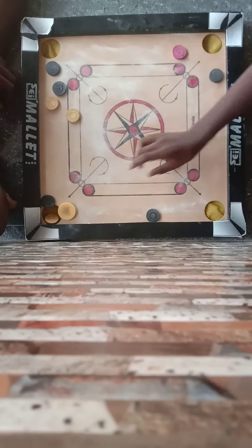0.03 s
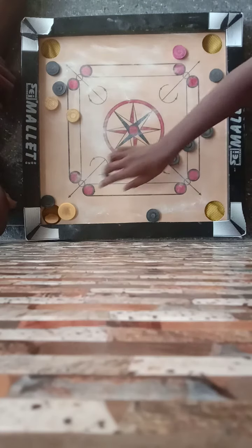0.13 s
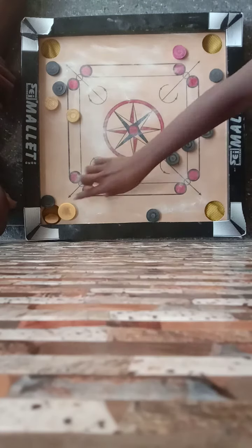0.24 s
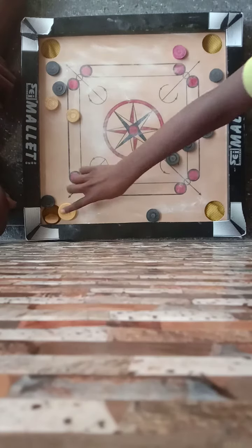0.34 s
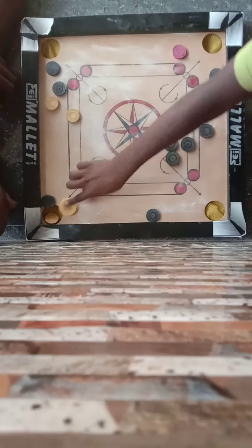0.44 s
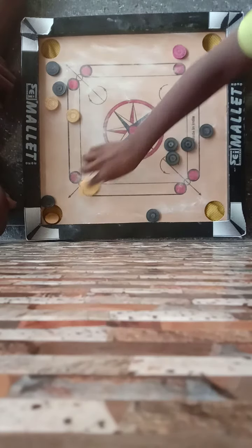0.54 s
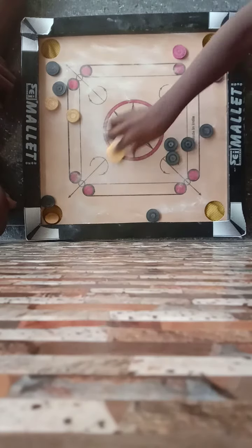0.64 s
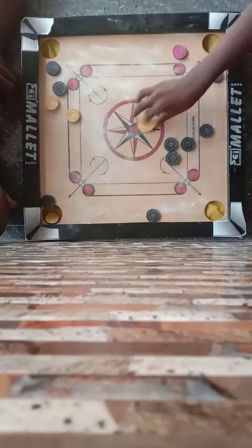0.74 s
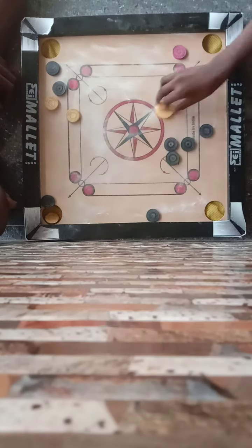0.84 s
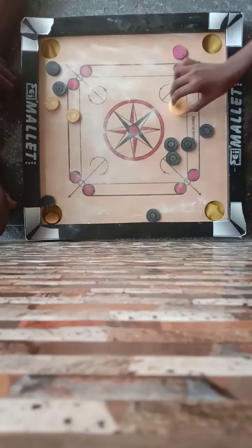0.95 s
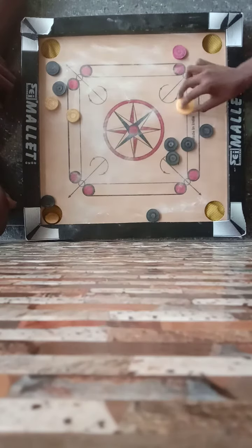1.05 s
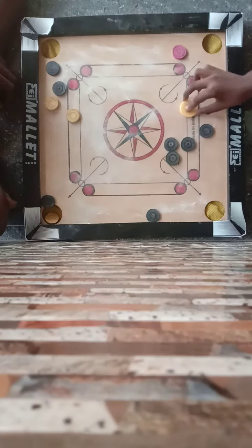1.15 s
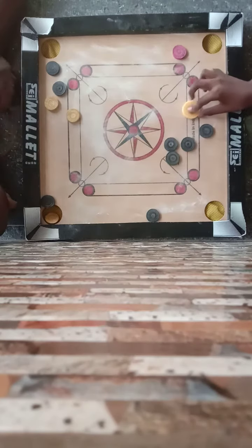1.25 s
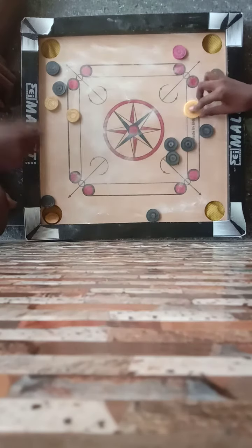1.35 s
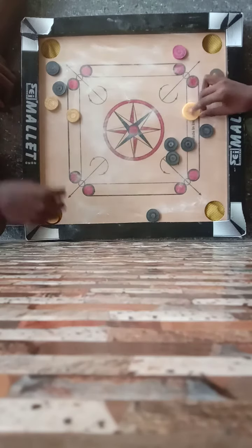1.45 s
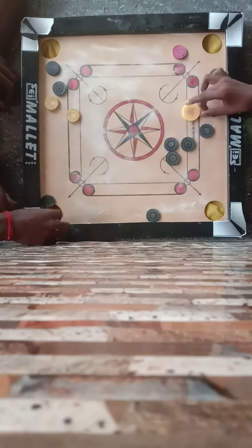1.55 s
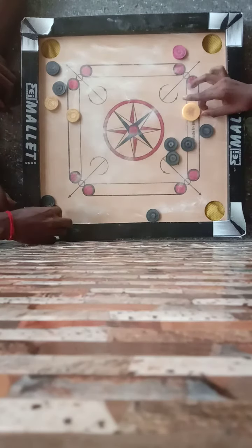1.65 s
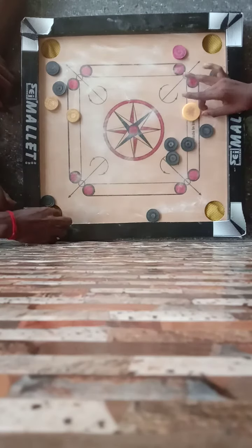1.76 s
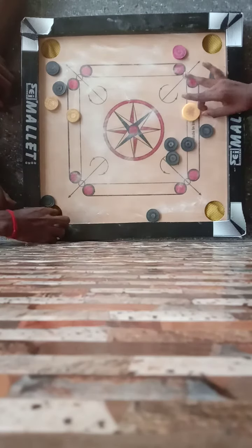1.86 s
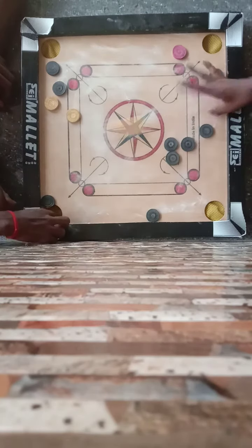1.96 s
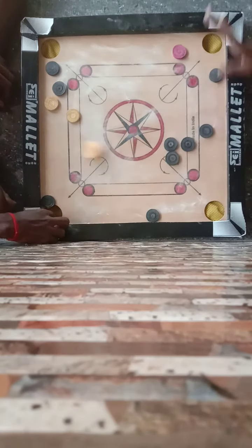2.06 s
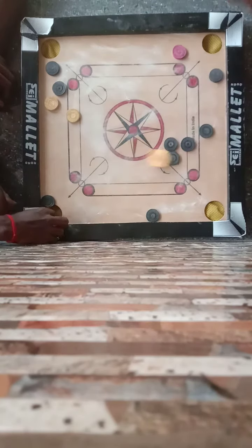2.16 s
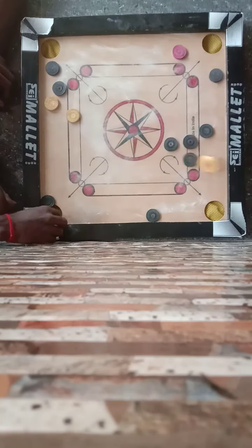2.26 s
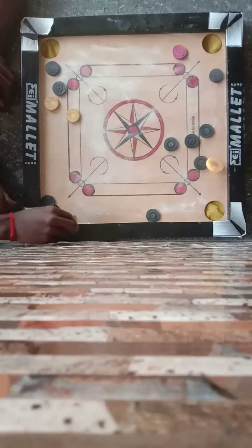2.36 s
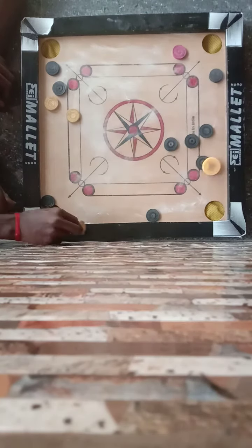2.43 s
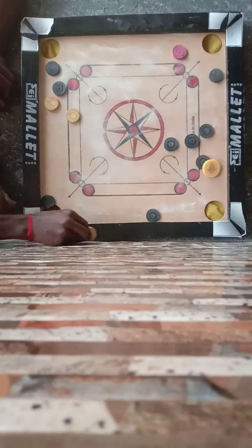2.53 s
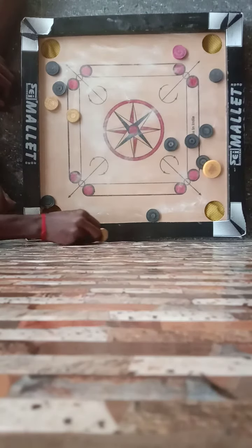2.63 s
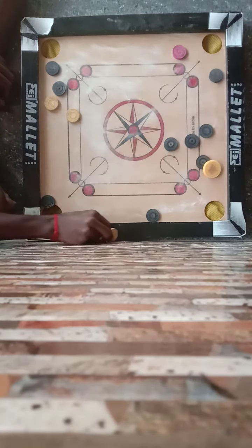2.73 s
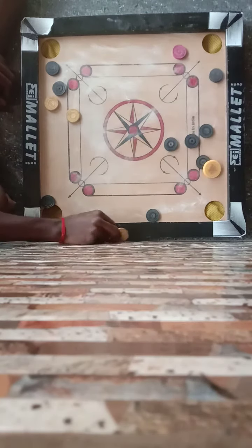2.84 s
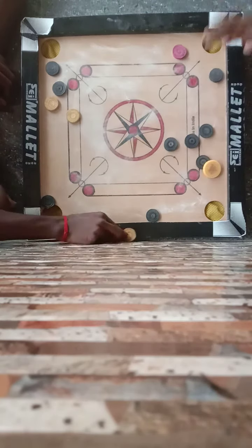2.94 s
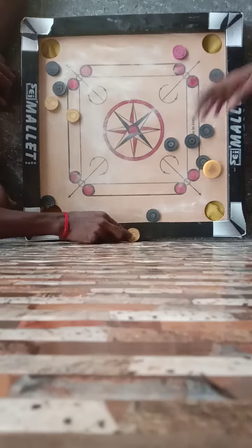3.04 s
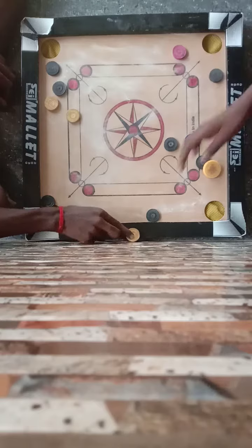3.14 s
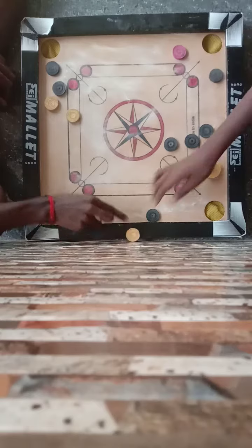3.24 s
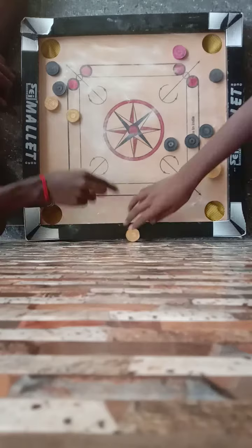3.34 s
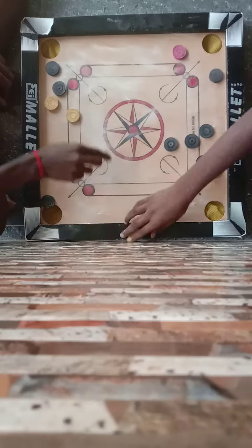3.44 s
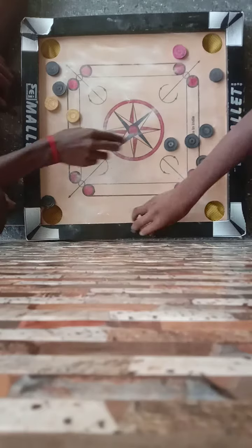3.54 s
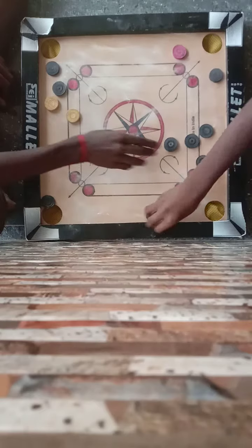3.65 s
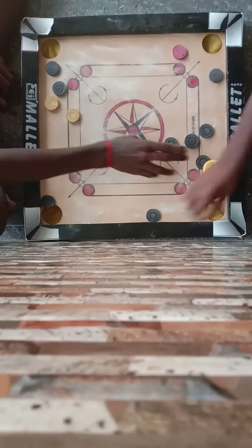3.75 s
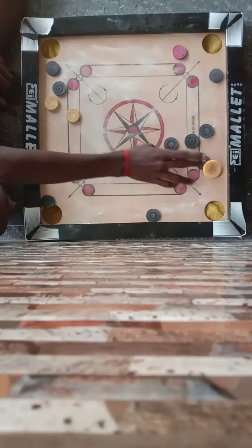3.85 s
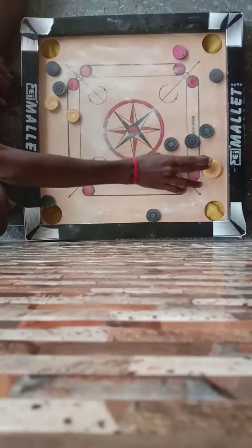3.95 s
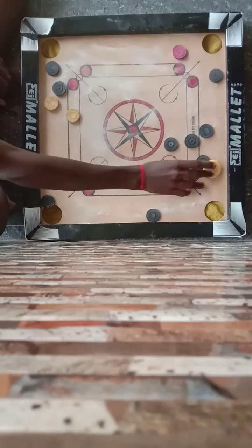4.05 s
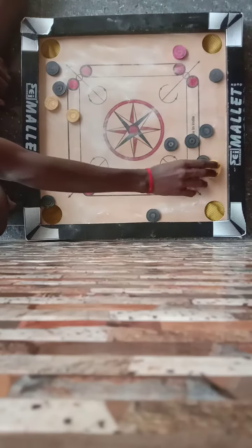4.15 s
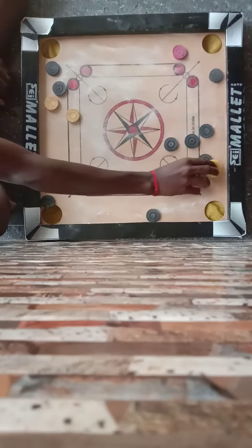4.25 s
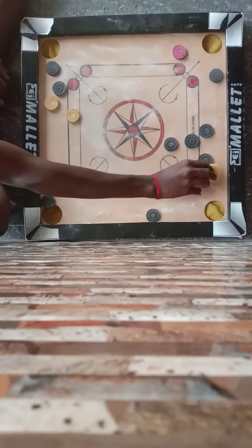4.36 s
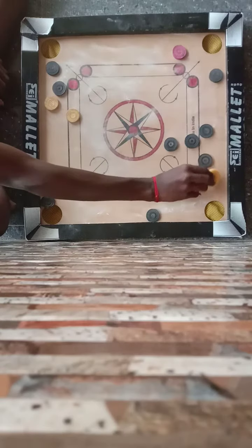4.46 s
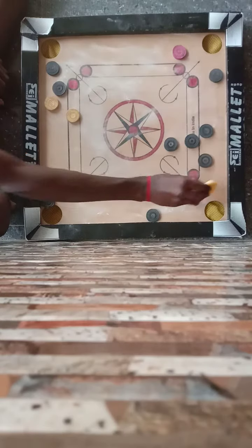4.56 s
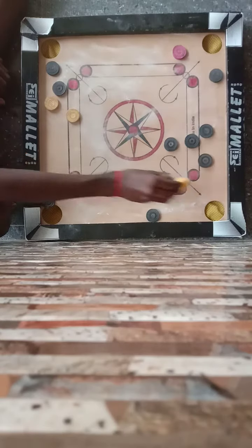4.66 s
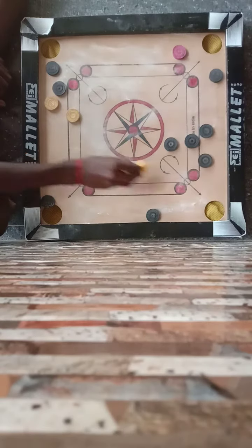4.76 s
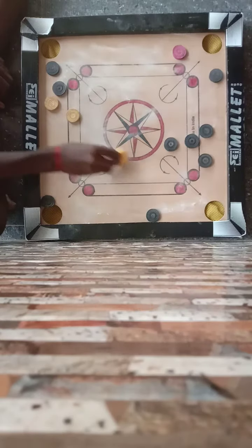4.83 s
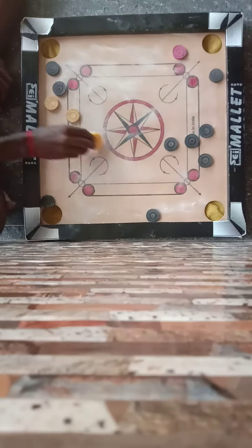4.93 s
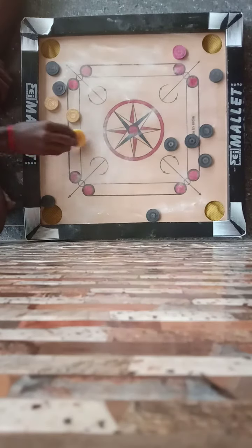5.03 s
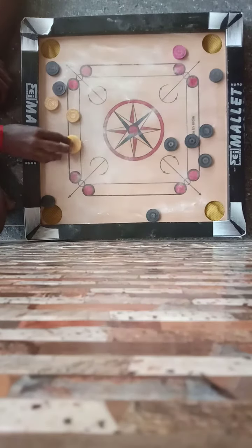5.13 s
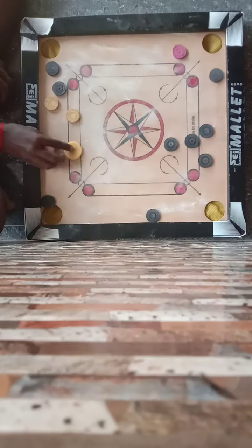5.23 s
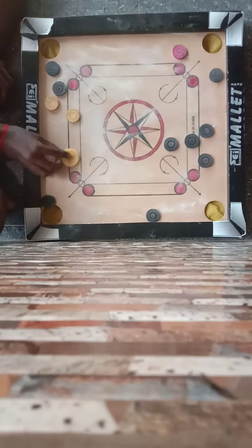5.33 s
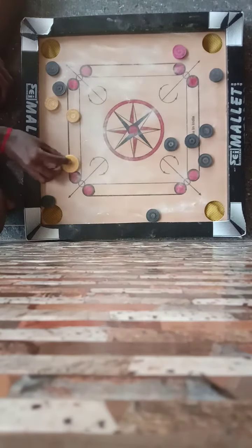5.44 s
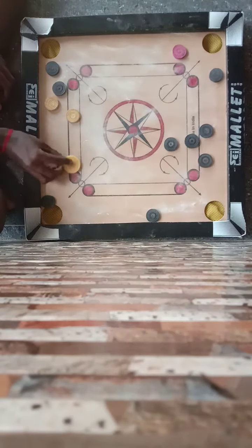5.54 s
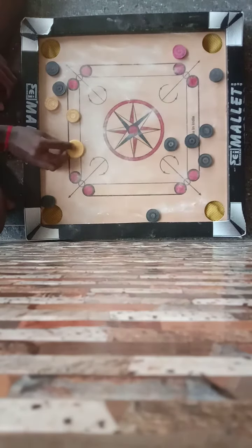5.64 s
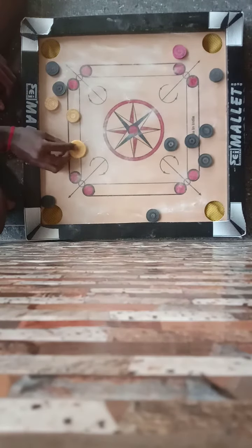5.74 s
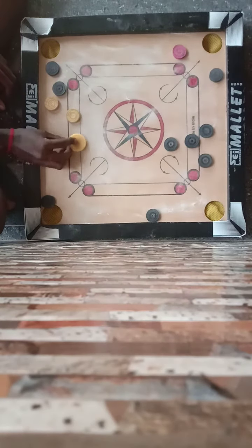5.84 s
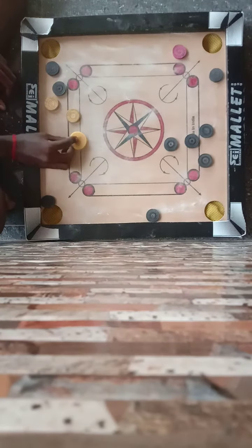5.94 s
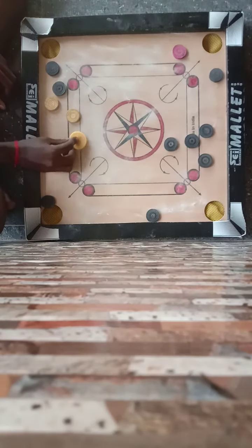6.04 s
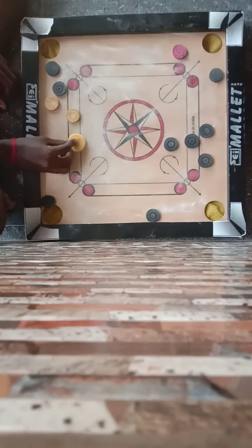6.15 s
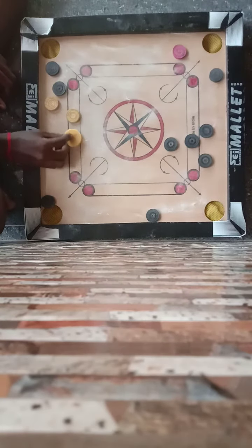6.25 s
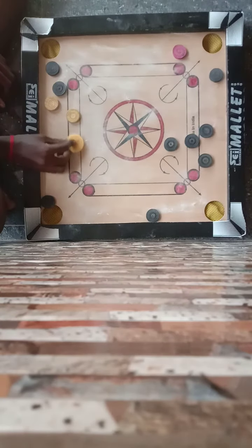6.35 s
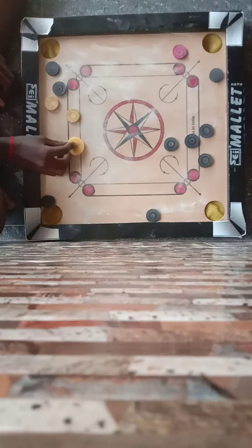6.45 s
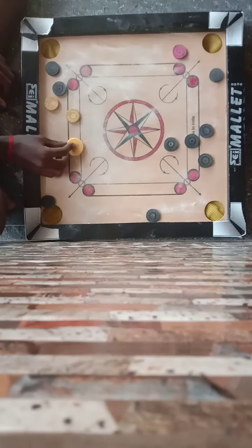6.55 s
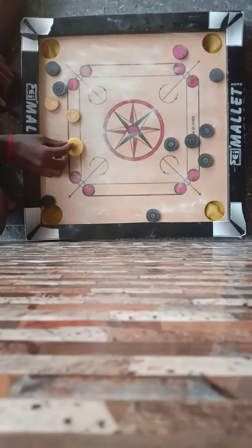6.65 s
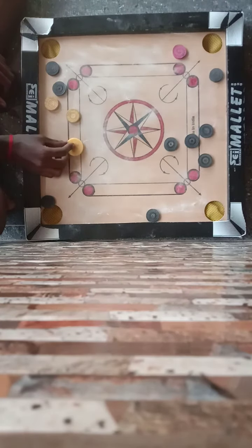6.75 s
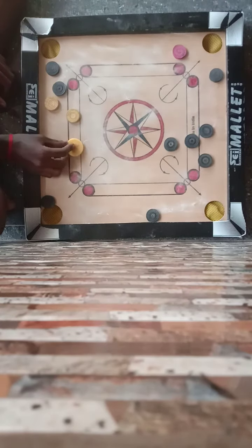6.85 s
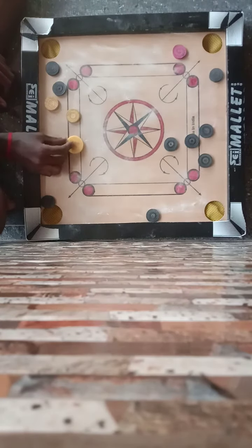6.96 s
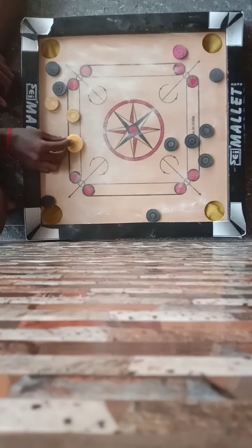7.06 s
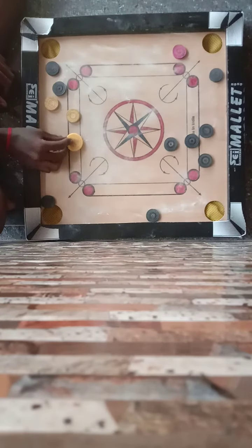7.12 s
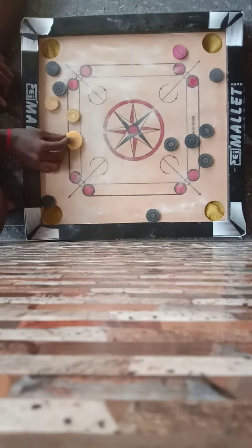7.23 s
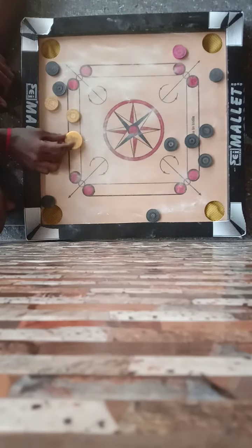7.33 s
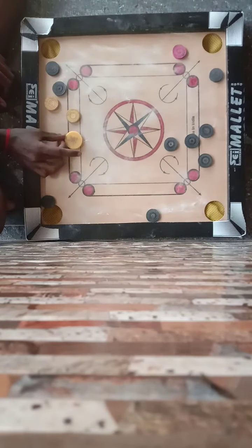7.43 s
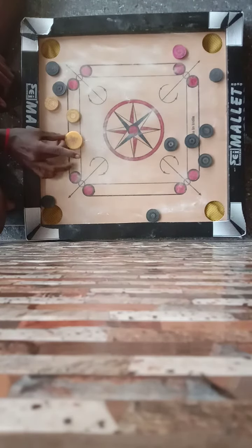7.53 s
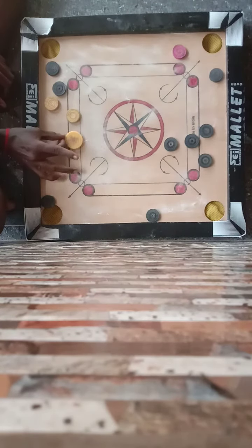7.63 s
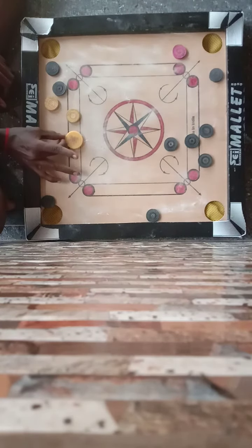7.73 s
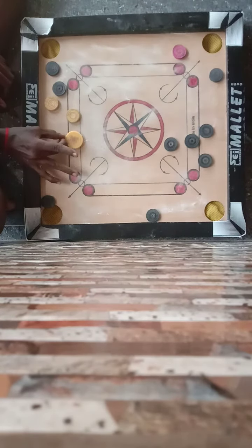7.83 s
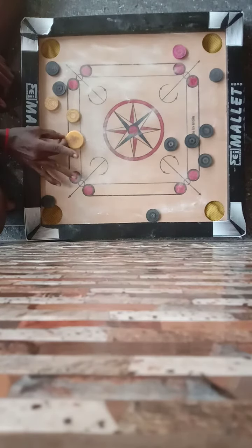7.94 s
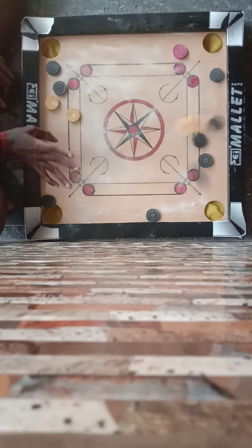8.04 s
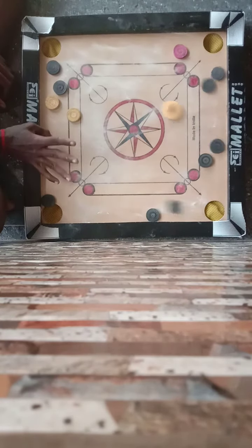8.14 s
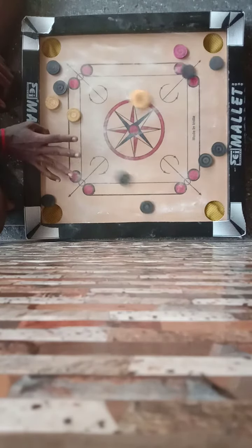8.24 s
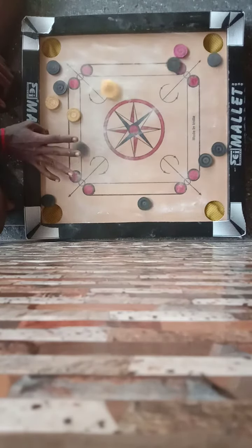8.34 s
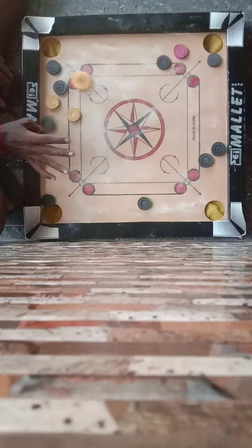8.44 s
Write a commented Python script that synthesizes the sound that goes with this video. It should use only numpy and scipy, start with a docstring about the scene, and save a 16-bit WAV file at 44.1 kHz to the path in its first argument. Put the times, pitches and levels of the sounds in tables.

```python
"""Carrom discs clack, drum a plywood board and knock on its frame: damped modes rung by brief contacts.
Sliding discs hiss and rumble: noise grains follow the disc speed and keep the board ringing.
Soft thumps are decaying sines, players' shifts are resonant noise, faint birds are arched whistles.
A fan drone and thin hiss lie beneath. Board and birds get a room with a ceiling echo; mono, limited."""
import sys
import numpy as np
from scipy import signal
from scipy.fft import rfft, irfft, next_fast_len
from scipy.io import wavfile
from scipy.ndimage import uniform_filter1d, minimum_filter1d, map_coordinates

SR = 44100
rng = np.random.default_rng(int(sys.argv[2]) if len(sys.argv) > 2 else 0)


def wrap_up_sound(samples):
    """Save the sound to the file named by the first command line argument, as 16-bit audio."""
    columns = np.atleast_2d(samples).T
    # keep every value between -1 and 1, then stretch to whole-number steps
    tamed = np.clip(columns, -1, 1)
    steps = np.round(tamed * 32767).astype(np.int16)
    wavfile.write(sys.argv[1], SR, steps)


N = 374409

# fan-stirred air spectrum: f/Hz, relative level/dB
AIR_SPECTRUM = [(15, -49), (25, -48), (64, -14.5), (108, -10), (172, -2), (211, -10), (242, -3.5),
                (291, -10.5), (334, -5), (471, -18), (695, -6.5), (762, -13), (1230, -8), (2000, -24.5),
                (6000, -33), (7800, -90), (13200, -120)]
# fan drone peaks: f/Hz, width/Hz, relative level/dB
DRONE_PEAKS = [(177.4, 10.6, -1), (325.7, 12, -8.5), (704, 22, -9.5), (810, 29, -10.5), (1256, 86, -8)]
# thin background hiss spectrum: f/Hz, relative level/dB
SIZZLE_SPECTRUM = [(4500, -40), (6000, 4), (6650, -7), (7200, 9.5), (7900, 5), (9000, -10), (11000, -18.5),
                   (14000, -26), (15200, -8), (15700, -52)]
# room decay: f/Hz, t60/s
ROOM_DECAY = [(150, 0.15), (400, 0.17), (1200, 0.32), (2500, 0.28), (6000, 0.25), (14000, 0.21)]
# low room resonances: f/Hz, width/Hz, relative level/dB
ROOM_RESONANCES = [(88.4, 26, -8), (131, 44, -3.5), (175.5, 25, 0.5), (238, 44, -3.5), (330, 48, -2)]
# faint birds outside: t/s, level before room/dB, f/Hz, length/s
BIRD_CHIRPS = [(0.918, -69, 4720, .12), (1.209, -71, 5120, 0.1), (1.32, -72, 8850, 0.024)]
# players lean or shift on the floor: t/s, length/s, level/dB
PLAYER_SHIFTS = [(0.025, 0.32, -56), (1.46, 0.35, -53), (2.573, .2, -44), (3.95, 0.11, -49),
                 (4.204, 0.12, -42), (4.471, .16, -45), (5.86, 0.15, -46.5), (6.14, 0.17, -44.5),
                 (6.57, 0.18, -48.5), (6.9, .16, -46)]
# soft bumps of knees and elbows: t/s, relative level/dB, f/Hz
BODY_BUMPS = [(2.628, -41, 92.5), (3.08, -23.5, 92), (3.145, -33, 86.1), (3.253, -27.5, 124),
              (3.353, -28.5, 72.7), (3.459, -21, 91.5), (3.503, -36, 87), (3.618, -40, 86.1),
              (3.762, -30, 103), (3.907, -39, 70.0), (6.732, -40, 65), (7.37, -32.5, 100), (7.47, -30, 74),
              (7.562, -32, 96), (7.659, -37, 78.1), (7.722, -31.5, 80.7), (7.768, -28, 88.8),
              (7.866, -34, 72.7)]
# plywood surface modes: f/Hz, relative level/dB, t60/s
SURFACE_MODES = [(332.3, -11.5, 0.29), (423, -3, 0.098), (457, -6.5, 0.12), (457, 3, 0.029),
                 (573.4, -11, 0.15)]
# frame modes: f/Hz, relative level/dB, t60/s
FRAME_MODES = [(750, -6.5, 0.058), (820, -10.5, 0.11), (963, 10.5, 0.0046), (982, -10, 0.048),
               (1107, -9.5, 0.042), (1221, -1.5, 0.061), (1279.3, -7.5, 0.082), (1364, -17, 0.018),
               (1597, -15, 0.077), (1727, -17.5, 0.044), (2114, -13, 0.024), (2350, -41, 0.022)]
# striker and disc modes: f/Hz, relative level/dB, t60/s
DISC_MODES = [(2155, -30.5, 0.014), (2430, -34, 0.044), (3850, -49, 0.032), (6050, -23, 0.036),
              (7350, -19, 0.025)]
# slide rumble spectrum: f/Hz, relative level/dB
RUMBLE_SPECTRUM = [(120, -55), (200, -32), (300, -11.5), (420, 0.5), (510, -5), (600, 2.5), (1000, -1),
                   (1280, 1.5), (1430, -13), (1750, -19.5), (2400, -50.5)]
# slide hiss spectrum: f/Hz, relative level/dB
HISS_SPECTRUM = [(700, -40), (1700, -1), (3000, -0.5), (4200, 2.5), (6000, 1.5), (6600, -1.5), (7500, 3),
                 (9000, -12.5), (11000, -24), (13500, -37), (15200, -17)]
# extra treble of fast slides: f/Hz, relative level/dB
FIZZ_SPECTRUM = [(3000, -25), (7500, -2), (9500, -4), (13000, -20), (15200, -5)]
# disc contact spectrum: f/Hz, relative level/dB
CRACK_SPECTRUM = [(600, 2), (1500, -2.5), (2200, -1.5), (3200, -1.5), (4500, 2), (6000, 1.5), (7700, 4),
                  (9000, -4), (11000, -11.5), (13500, -22), (15200, -4)]
# hand pushes a disc or brushes the board: t/s, length/s, relative rumble level/dB, relative hiss level/dB
HAND_STROKES = [(.395, 0.49, -30.5, -34), (1.14, 0.19, -46, -62), (3.49, 0.28, -62, -49.5),
                (3.66, 0.17, -64, -46), (3.81, 0.089, -46.5, -46.5), (3.9, 0.15, -54, -56),
                (4.28, 0.1, -43.5, -52), (4.4, 0.1, -44, -53.5), (4.815, .26, -36, -40),
                (5.21, .27, -39, -49), (5.47, 0.22, -39, -67.5), (5.55, 0.086, -35, -39.5),
                (5.71, 0.2, -40, -56.5), (5.99, 0.22, -45, -64), (6.18, 0.096, -38.5, -51.5),
                (6.315, 0.078, -42, -46.5), (6.81, 0.091, -58, -54.5)]
# struck discs glide to rest: t/s, length/s, relative rumble level/dB, relative hiss level/dB
FREE_GLIDES = [(1.935, 0.41, -36.5, -36), (2.035, 0.16, -27.5, -26.5), (7.963, .25, -36, -37.5),
               (8.17, 0.68, -29, -37.5)]
# taps of fingers and held discs, levels before bass cut: t/s, thud level/dB, knock level/dB
SOFT_TAPS = [(.393, -38, -40), (.483, -27.5, -26.5), (1.412, -40.5, -39.5), (1.447, -39, -55),
             (2.88, -32, -42), (3.05, -43.5, -62), (3.551, -32.5, -37.5), (3.715, -34.5, -52),
             (5.766, -45, -43), (6.328, -61, -35), (8.281, -32, -28)]
# hard disc contacts, levels before bass cut:
# t/s, surface thud level/dB, frame knock level/dB, disc click level/dB, click brightness f/Hz
HARD_HITS = [(.453, -24, -31.5, -38, 3000), (1.0802, -28.5, -20, -27.5, 4140),
             (1.934, -32.5, -26.5, -32, 5800), (1.962, -27.5, -26.5, -29.5, 3430),
             (1.995, -40, -25, -48, 4500), (2.0086, -24, -18.5, -13.5, 5000),
             (2.135, -19, -19.5, -30.5, 3020), (2.169, -24, -18, -25, 3120),
             (2.268, -29, -16.5, -29.5, 4500), (2.294, -26.5, -16, -36, 3000),
             (2.324, -28.5, -17, -27, 4470), (2.349, -36, -20.5, -36, 3000),
             (2.376, -46, -19.5, -33.5, 2500), (2.403, -28.5, -27.5, -20.5, 7800),
             (2.432, -46, -18, -40, 6000), (2.456, -48, -21.5, -23.5, 3850), (2.497, -50, -23, -29.5, 2900),
             (2.764, -46, -34.5, -40, 2660), (2.858, -42, -28.5, -21, 13000),
             (3.504, -58, -46, -38.5, 4370), (4.8218, -19.5, -21, -31, 3000),
             (5.0964, -23, -18.5, -29.5, 2320), (7.448, -69, -65, -41, 11200),
             (7.963, -31.5, -28.5, -32.5, 8400), (8.015, -28, -27.5, -22.5, 10500),
             (8.026, -43, -26.5, -32, 10000), (8.056, -50, -28, -16, 7200), (8.076, -43, -27.5, -24, 4830),
             (8.096, -49, -29, -20.5, 5000), (8.14, -48, -23, -20.5, 5240), (8.169, -36, -21, -33.5, 3700),
             (8.448, -40, -25.5, -29, 3800)]

RUMBLE_POWER, HISS_POWER = 0.39, 1.48  # exponents of disc speed
LINGER_T60_S = 0.31  # the room holds on to a slide
FIDGET_DB = -60.5  # rub of clothes between shifts
TOP_HZ = 15700


def amp(db):
    """Decibels to gain."""
    return 10 ** (np.asarray(db) / 20)


def unit(x):
    """Scale to rms 1."""
    return x / np.sqrt(np.mean(x ** 2) + 1e-20)


def along(points, hz):
    """Read (f/Hz, value) points on a log axis."""
    f, v = np.transpose(points)
    return np.interp(np.log(hz + 1), np.log(f + 1), v)


def wobble(rate_hz):
    """Smooth random curve with rate_hz knots a second."""
    knots = rng.standard_normal(int(N * rate_hz / SR) + 4)
    return map_coordinates(knots, [np.arange(N) * rate_hz / SR])


def filtered(x, response):
    """Apply a response of frequency."""
    m = next_fast_len(N + SR // 2)
    return irfft(rfft(x, m) * response(np.fft.rfftfreq(m, 1 / SR)), m)[:N]


def coloured(x, spectrum):
    """Shape x by a spectrum, at rms 1."""
    return unit(filtered(x, lambda hz: amp(along(spectrum, hz))))


def resonance(f, hz, width_hz):
    """Gain of one resonant peak."""
    return 1 / (1 + (2 * (f - hz) / width_hz) ** 2)


def causal(gain, size=1024):
    """Minimum-phase pulse with this gain over frequency, by folding the cepstrum."""
    cepstrum = irfft(np.log(gain(np.fft.rfftfreq(size, 1 / SR)) + 1e-6))
    fold = 1 + np.sign(np.fft.fftfreq(size))
    return irfft(np.exp(rfft(cepstrum * fold)))


def add(track, t_s, sound):
    """Mix a sound into the track at t_s."""
    part = track[max(round(t_s * SR), 0):][:len(sound)]
    part += sound[:len(part)]


def ring(modes, scatter_db, contact_s=0.00018):
    """Damped modes set going by a brief contact; random strengths stand for where the blow lands."""
    t = np.arange(SR // 5) / SR
    tone = np.zeros(len(t))
    for hz, db, t60_s in modes:
        sign = rng.choice([-1, 1])
        decay = amp(db + scatter_db * rng.standard_normal() - 60 * t / t60_s)
        tone += sign * decay * np.sin(2 * np.pi * hz * t)
    return tone * (1 - np.exp(-(t / contact_s) ** 2))


def room(arrival, walls_db, tail_db, ceiling_s=.0073, ceiling_db=5, walls_t60_s=0.034, build_s=0.0088):
    """Room path: direct arrival, ceiling echo, burst from the walls, diffuse tail."""
    hz, frames_s, z = signal.stft(rng.standard_normal(SR // 2), SR, nperseg=256)
    decay = amp(-60 * frames_s / along(ROOM_DECAY, hz)[:, None])
    tail = signal.istft(z * decay, SR, nperseg=256)[1]
    t = np.arange(len(tail)) / SR
    tail = tail * (1 - np.exp(-t / build_s))
    walls = rng.standard_normal(len(t)) * (t > ceiling_s) * amp(-60 * t / walls_t60_s)
    path = amp(tail_db) * tail / np.linalg.norm(tail) + amp(walls_db) * walls / np.linalg.norm(walls)
    add(path, 0, arrival)
    add(path, ceiling_s, amp(ceiling_db) * arrival)
    return path


def heard(blow, path):
    """A blow through the room, with the energy of 20 ms at rms 1."""
    sound = signal.fftconvolve(blow, path)
    return sound / np.linalg.norm(sound) * np.sqrt(.02 * SR)


def radiated(x, edge_hz=295):
    """A small open board cannot push out bass: the air slips round it."""
    return signal.sosfilt(signal.butter(6, edge_hz, "highpass", fs=SR, output="sos"), x)


def background(air_db=-48.0, drone_db=-53, sizzle_db=-66, flutter_db=1.0, waver_db=3):
    """A fan stirs the air with a wavering drone; a thin hiss lies on top."""
    air = coloured(rng.standard_normal(N), AIR_SPECTRUM) * amp(flutter_db * wobble(12))
    peaks = lambda f: sum(amp(db) * resonance(f, hz, width_hz) for hz, width_hz, db in DRONE_PEAKS)
    drone = unit(filtered(rng.standard_normal(N), peaks) * amp(waver_db * wobble(9)))
    sizzle = coloured(rng.standard_normal(N), SIZZLE_SPECTRUM)
    return amp(air_db) * air + amp(drone_db) * drone + amp(sizzle_db) * sizzle


def birds(arch=0.044, quaver=0.0144):
    """Thin arched, quavering whistles, blurred by the room."""
    out = np.zeros(N)
    for t_s, db, hz, length_s in BIRD_CHIRPS:
        swell = np.sin(np.linspace(0, np.pi, round(length_s * SR)))
        pitch_hz = hz * (1 + arch * (swell - 1) + quaver * wobble(146)[:len(swell)])
        add(out, t_s, amp(db) * swell * np.sin(2 * np.pi * np.cumsum(pitch_hz) / SR))
    return signal.fftconvolve(out, room(np.ones(1), walls_db=0, tail_db=6))[:N]


def push(length_s):
    """Speed of a hand's or body's move, 0-1: half sine from rest to rest."""
    return np.sin(np.pi * np.arange(round(length_s * SR)) / round(length_s * SR))


def shifting(uneven_db=3.5):
    """Players lean over the board; their dull rub wakes each low room resonance unevenly."""
    rub, effort = np.zeros(N), np.full(N, amp(FIDGET_DB))
    for hz, width_hz, db in ROOM_RESONANCES:
        band = unit(filtered(rng.standard_normal(N), lambda f: resonance(f, hz, width_hz)))
        rub += band * amp(db + uneven_db * wobble(14))
    for t_s, length_s, db in PLAYER_SHIFTS:
        add(effort, t_s, amp(db) * push(length_s) ** 2)
    return effort * unit(rub)


def thumps(rise_s=0.003, t60_s=0.11, level_db=-2, boom_db=-15, boom_t60_s=0.63):
    """Soft heavy bumps: a few slow cycles each, plus an uneven, longer boom from the room."""
    out, t = np.zeros(N), np.arange(SR // 2) / SR
    band = signal.butter(2, [58, 135], "bandpass", fs=SR, output="sos")
    for t_s, db, hz in BODY_BUMPS:
        bump = -np.sin(2 * np.pi * hz * t) * (1 - np.exp(-(t / rise_s) ** 2)) * amp(-60 * t / t60_s)
        noise = unit(signal.sosfilt(band, rng.standard_normal(len(t))))
        boom = noise * amp(boom_db - 60 * t / boom_t60_s)
        add(out, t_s, amp(db + level_db) * (bump / np.abs(bump).max() + boom))
    return out


def coast(length_s):
    """Speed of a free disc, 0-1: friction slows it evenly."""
    return np.linspace(1, 0, round(length_s * SR))


def friction():
    """Rumble and hiss strength: both follow disc speed, the hiss more steeply, and linger."""
    rumble, hiss = np.zeros(N), np.zeros(N)  # powers
    for moves, motion in (HAND_STROKES, push), (FREE_GLIDES, coast):
        for t_s, length_s, rumble_db, hiss_db in moves:
            speed = motion(length_s)
            add(rumble, t_s, (amp(rumble_db) * speed ** RUMBLE_POWER) ** 2)
            add(hiss, t_s, (amp(hiss_db) * speed ** HISS_POWER) ** 2)
    keep = amp(-60 / (LINGER_T60_S * SR)) ** 2
    return np.sqrt(signal.lfilter([1 - keep], [1, -keep], [rumble, hiss]))


def roaming(x, size=4096):
    """A moving source reaches the microphone by a new path in each half-overlapped window."""
    out, window = np.zeros(N), np.hanning(size)
    for start in range(0, N - size // 2, size // 2):
        piece = x[start:start + size]
        path = room(np.ones(1), walls_db=6, tail_db=7)
        add(out, start / SR, signal.fftconvolve(piece * np.sqrt(window[:len(piece)]), path))
    return out


def sliding(grain_db=3, judder_db=1, catch_db=.9, frame_db=-2.0, surface_db=-5, rumble_db=-2,
            fizz_db=-16, fast_db=-33):
    """Powder grains under a moving disc: a hiss, and tiny blows that keep the board ringing."""
    rumble, hiss = friction()
    grains = roaming(rng.standard_normal(N) * amp(grain_db * wobble(400))) * amp(judder_db * wobble(30))

    def ringing(modes):
        """Grains exciting the board modes, at rms 1."""
        return unit(radiated(signal.fftconvolve(grains, ring(modes, 0.36))[:N]))

    # low surface modes swell more steeply than the rumble
    drumming = amp(surface_db) * np.sqrt(rumble / rumble.max()) * ringing(SURFACE_MODES)
    board = coloured(grains, RUMBLE_SPECTRUM) + amp(frame_db) * ringing(FRAME_MODES) + drumming
    board = board * amp(catch_db * wobble(35))  # the disc catches unevenly
    fast = np.minimum(1, hiss / amp(fast_db)) ** 2  # a faster slide is brighter
    fizz = amp(fizz_db) * fast * coloured(grains, FIZZ_SPECTRUM)
    return amp(rumble_db) * rumble * board + hiss * (coloured(grains, HISS_SPECTRUM) + fizz)


def board_blow(thud_db, knock_db, contact_s):
    """One blow drums the surface and knocks the frame; a longer contact is softer."""
    path = room(np.ones(1), walls_db=0, tail_db=2.5)
    thud = heard(ring(SURFACE_MODES, scatter_db=0.5, contact_s=contact_s), path)
    knock = heard(ring(FRAME_MODES, scatter_db=3.5, contact_s=contact_s), path)
    return amp(thud_db) * thud + amp(knock_db) * knock


def disc_crack(bright_hz, ring_db=-11, spread_t60_s=0.024):
    """Disc contact: a pulse dulled above bright_hz, then ringing modes, through the room."""
    contact = causal(lambda hz: amp(along(CRACK_SPECTRUM, hz)) / np.sqrt(1 + (hz / bright_hz) ** 4))
    disc = ring(DISC_MODES, scatter_db=-0.5) * amp(ring_db)
    disc[0] += 1  # the contact itself, ahead of the ringing
    crack = signal.fftconvolve(disc, contact)
    # short waves leave from all over the board: each arrival is a brief burst
    t = np.arange(SR // 40) / SR
    burst = rng.standard_normal(len(t)) * amp(-60 * t / spread_t60_s)
    return heard(crack, room(burst / np.linalg.norm(burst), walls_db=0, tail_db=10.5))


def clacks():
    """Every contact sounds the board; a hard one also cracks the discs."""
    out = np.zeros(N)
    for t_s, thud_db, knock_db, click_db, bright_hz in HARD_HITS:
        add(out, t_s, amp(click_db) * disc_crack(bright_hz))
        add(out, t_s, board_blow(thud_db, knock_db, contact_s=0.00017))
    for t_s, thud_db, knock_db in SOFT_TAPS:
        add(out, t_s, board_blow(thud_db, knock_db, contact_s=.002))
    return radiated(out)


def scene():
    """One microphone feeds both channels."""
    mono = clacks() + sliding() + thumps() + shifting() + birds() + background()
    return np.array([mono, mono])


def record(dry, ceiling_db=-5):
    """A fast limiter ducks just ahead of each peak and holds briefly; then a cut at TOP_HZ."""
    needed = np.minimum(1, amp(ceiling_db) / (np.abs(dry).max(axis=0) + 1e-9))
    held = minimum_filter1d(needed, size=400, origin=170)  # samples; mostly after the peak
    gain = uniform_filter1d(held, size=60)
    return np.array([filtered(side * gain, lambda hz: hz < TOP_HZ) for side in dry])


dry = scene()
out = record(dry)
wrap_up_sound(out)
```